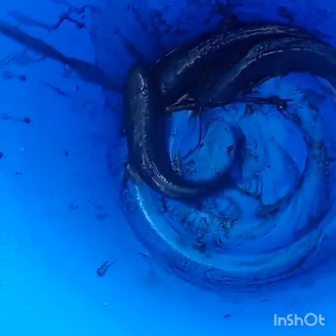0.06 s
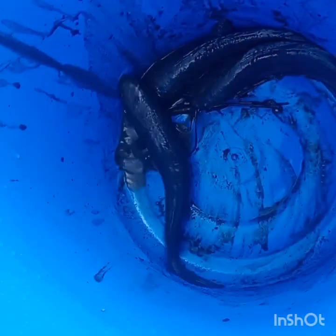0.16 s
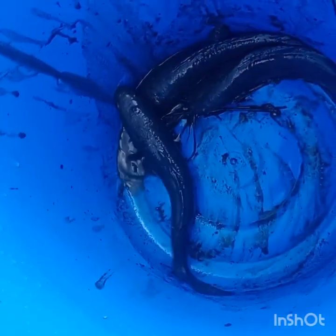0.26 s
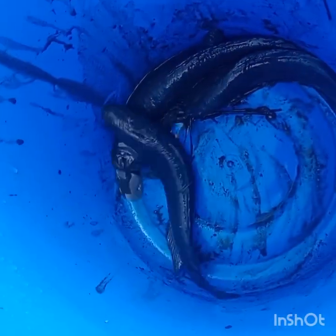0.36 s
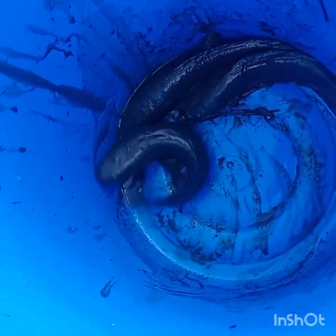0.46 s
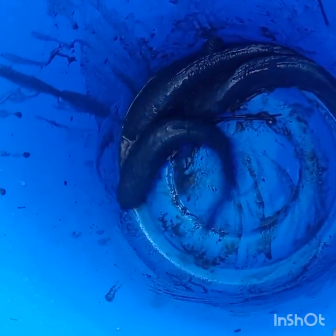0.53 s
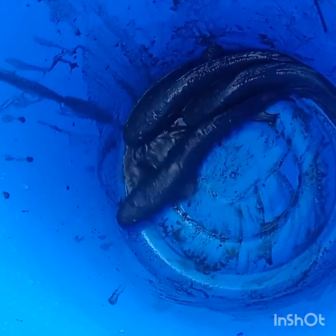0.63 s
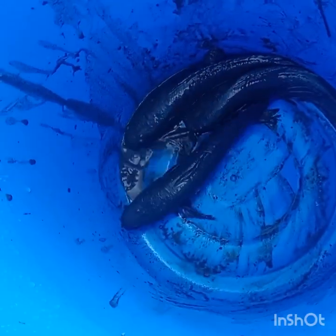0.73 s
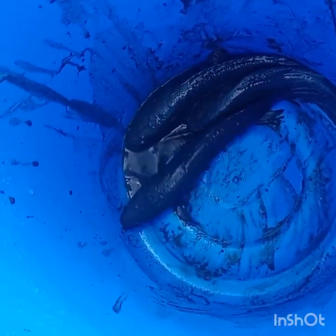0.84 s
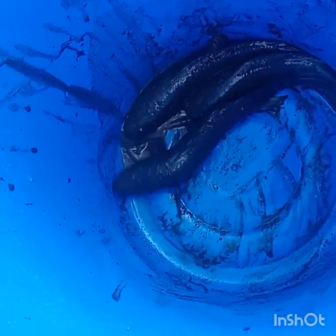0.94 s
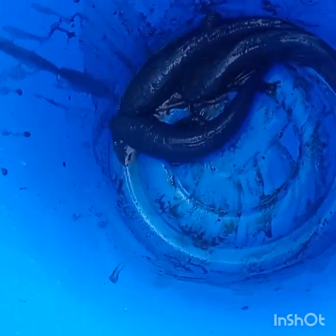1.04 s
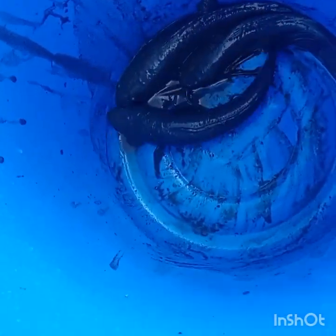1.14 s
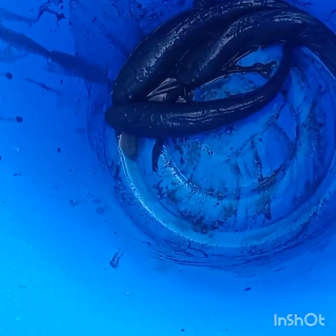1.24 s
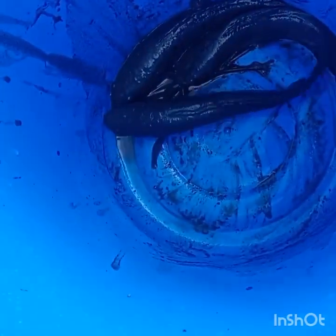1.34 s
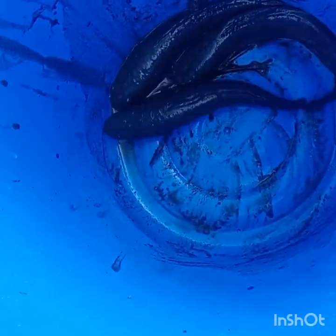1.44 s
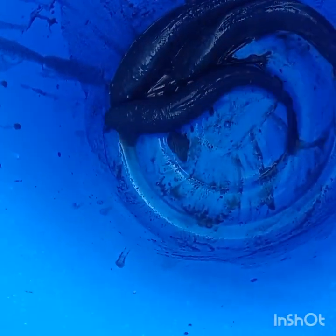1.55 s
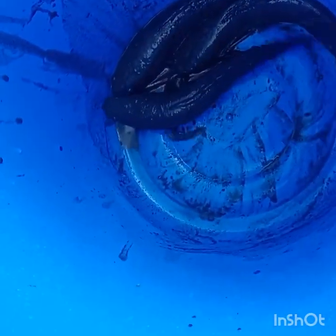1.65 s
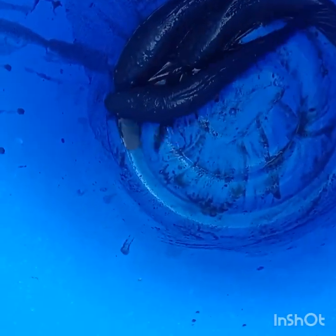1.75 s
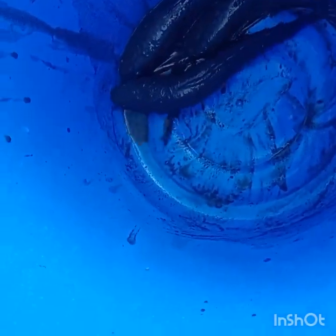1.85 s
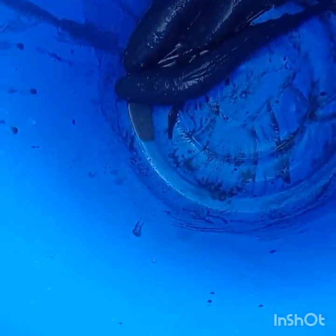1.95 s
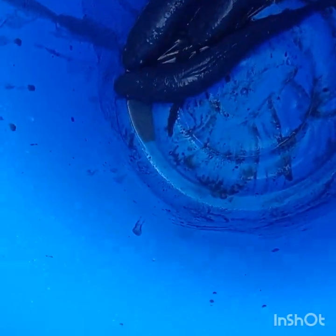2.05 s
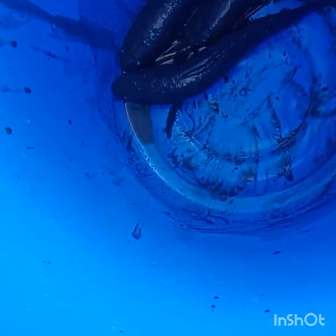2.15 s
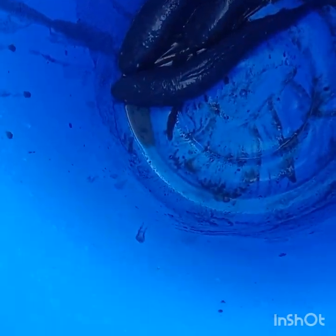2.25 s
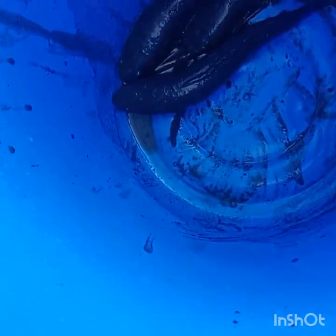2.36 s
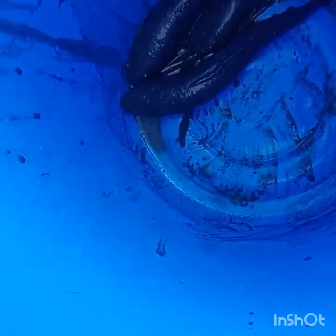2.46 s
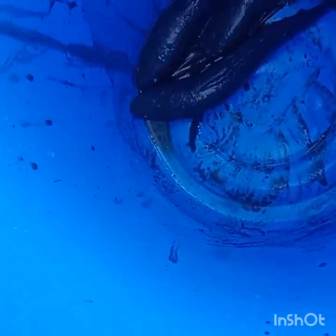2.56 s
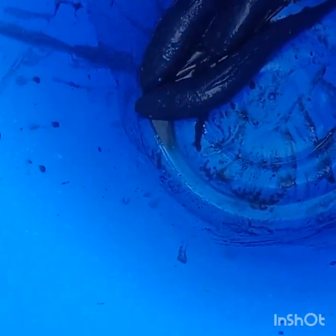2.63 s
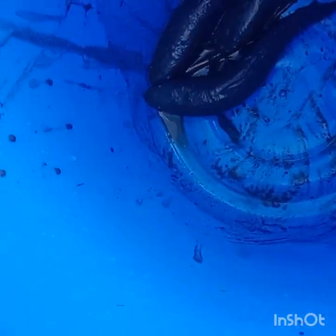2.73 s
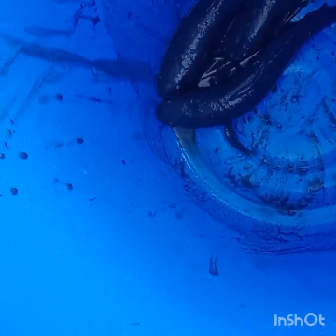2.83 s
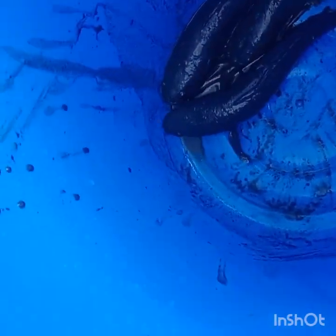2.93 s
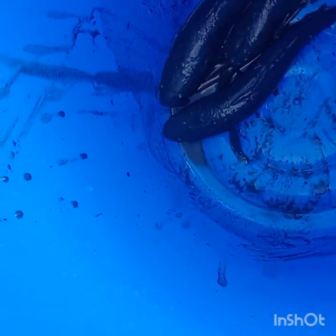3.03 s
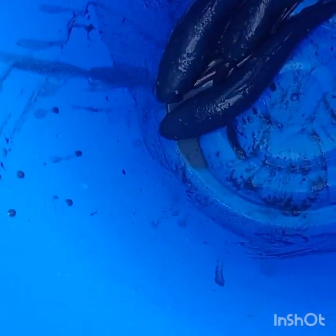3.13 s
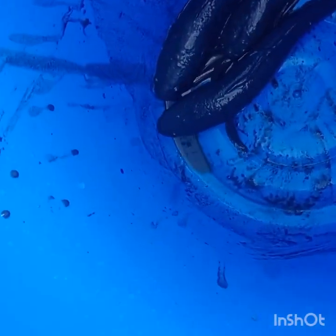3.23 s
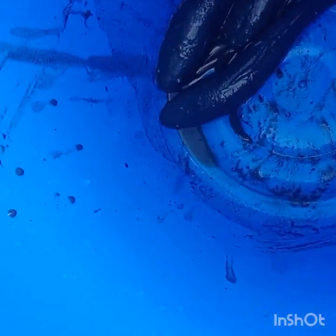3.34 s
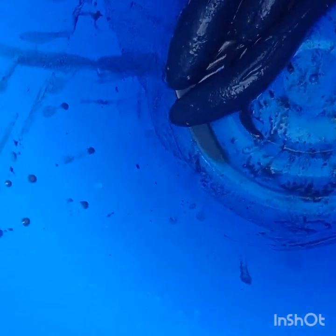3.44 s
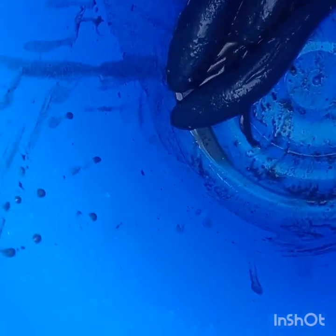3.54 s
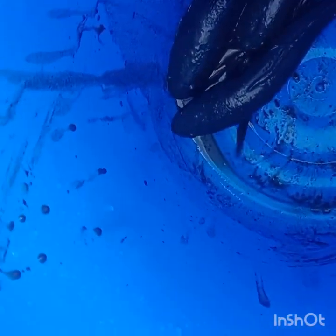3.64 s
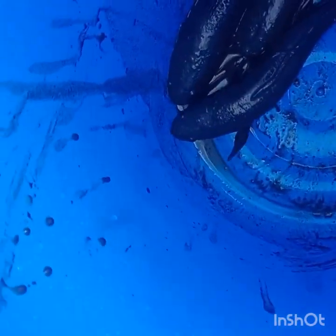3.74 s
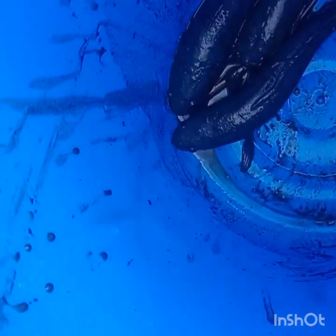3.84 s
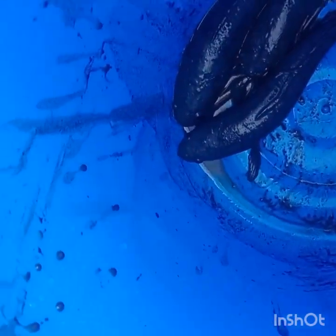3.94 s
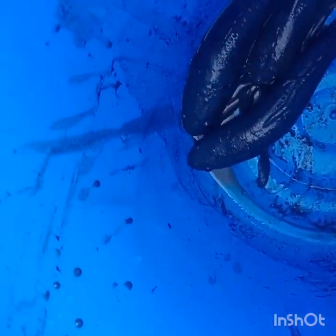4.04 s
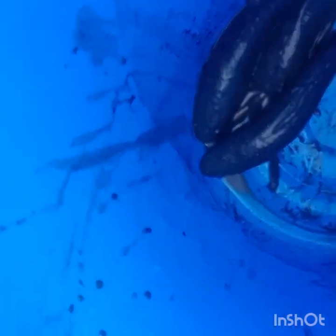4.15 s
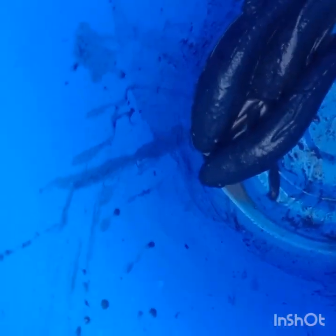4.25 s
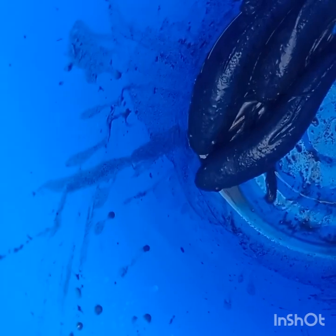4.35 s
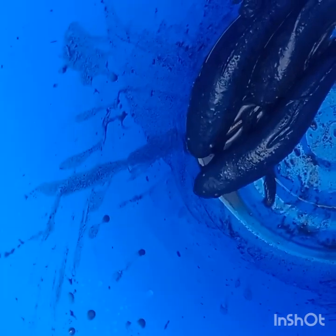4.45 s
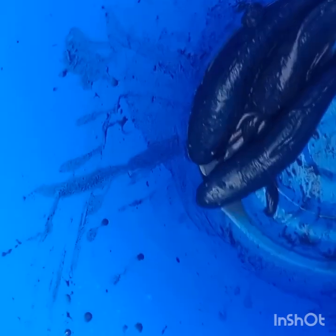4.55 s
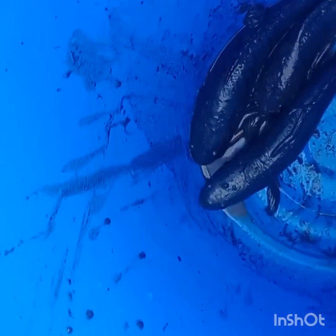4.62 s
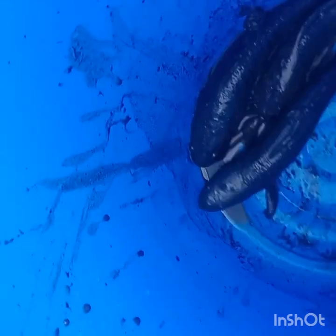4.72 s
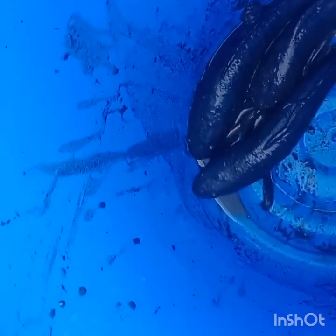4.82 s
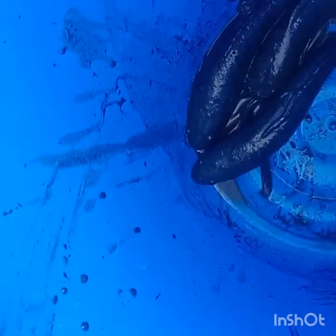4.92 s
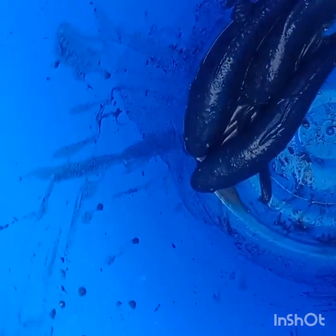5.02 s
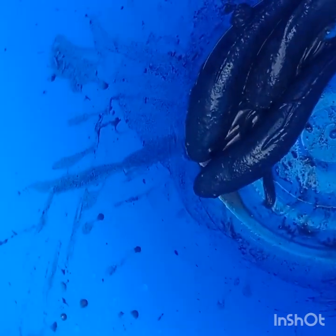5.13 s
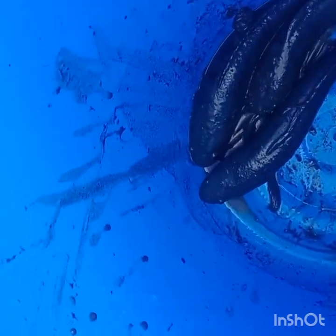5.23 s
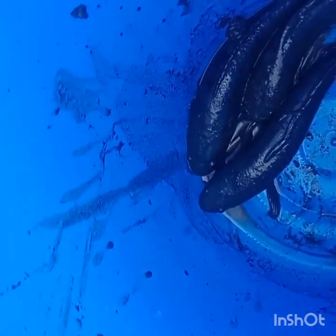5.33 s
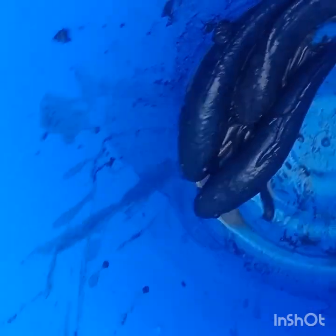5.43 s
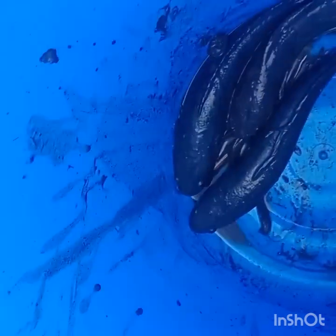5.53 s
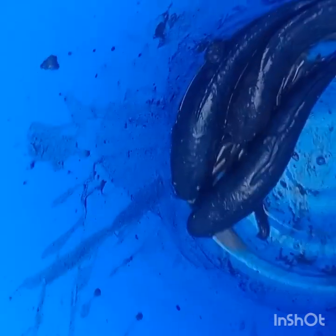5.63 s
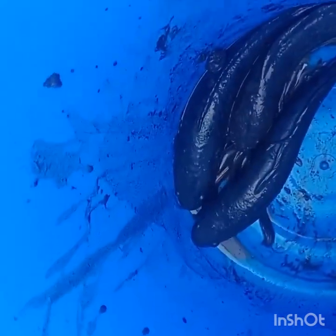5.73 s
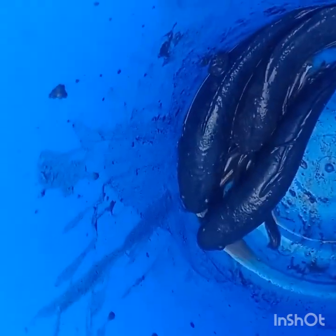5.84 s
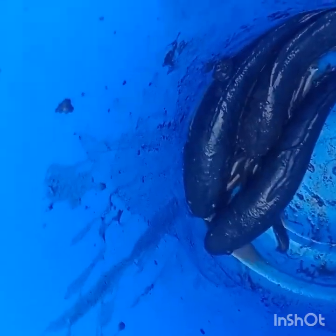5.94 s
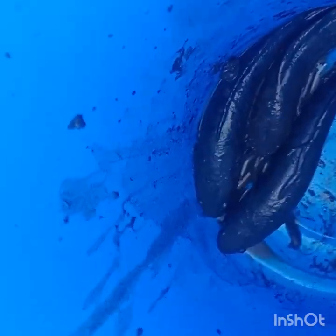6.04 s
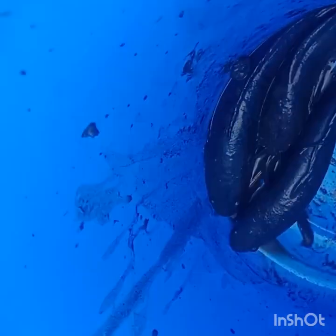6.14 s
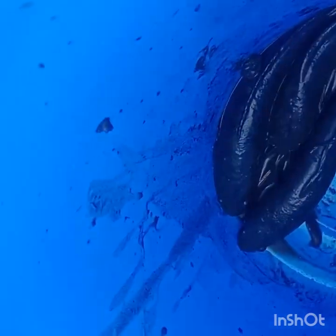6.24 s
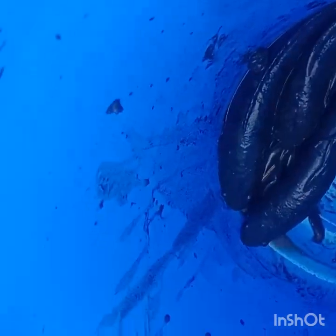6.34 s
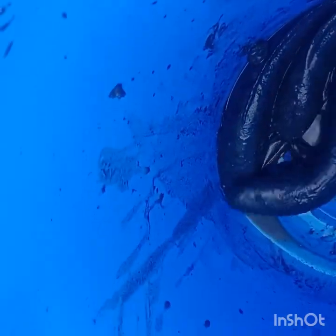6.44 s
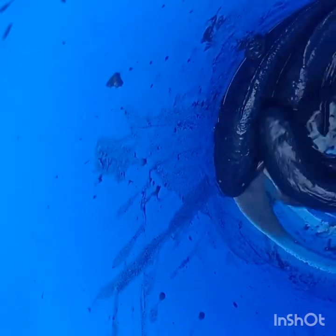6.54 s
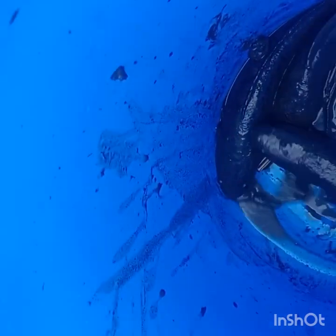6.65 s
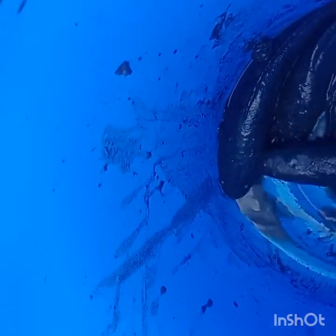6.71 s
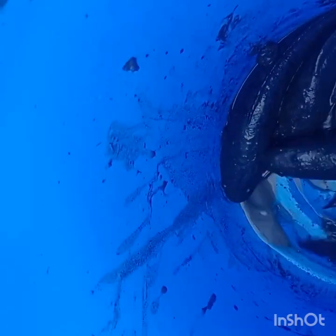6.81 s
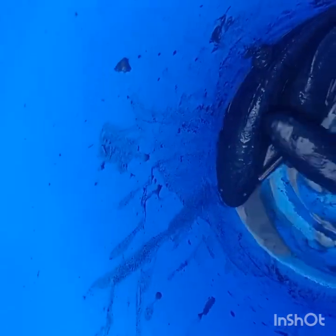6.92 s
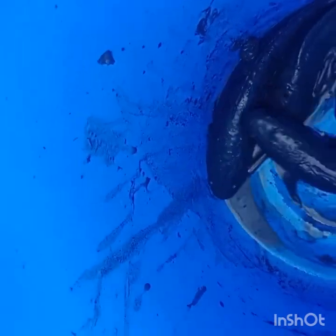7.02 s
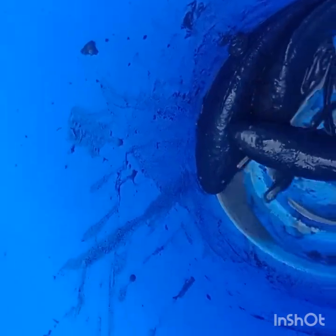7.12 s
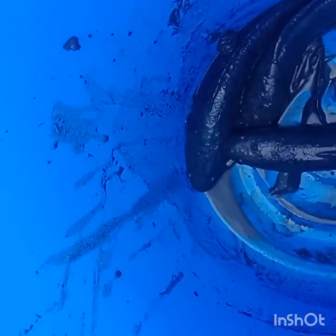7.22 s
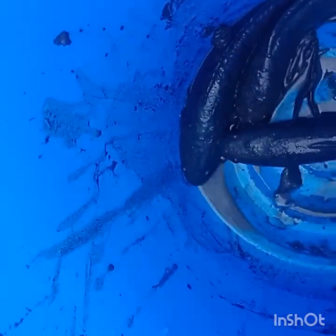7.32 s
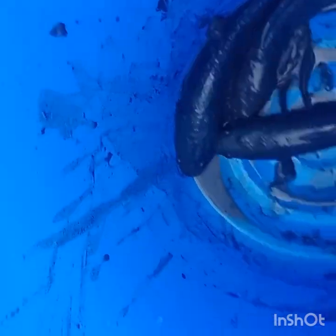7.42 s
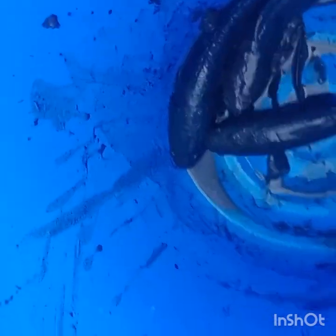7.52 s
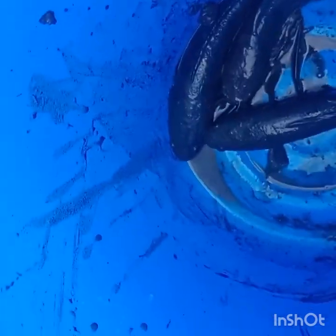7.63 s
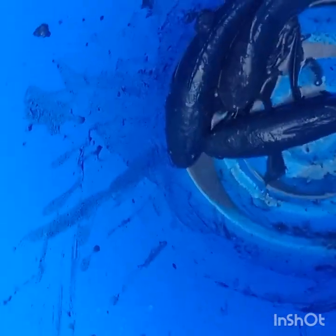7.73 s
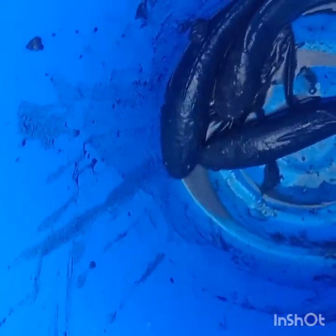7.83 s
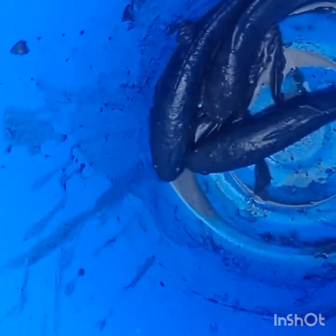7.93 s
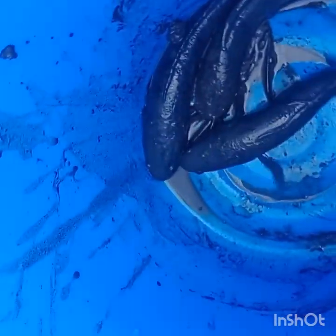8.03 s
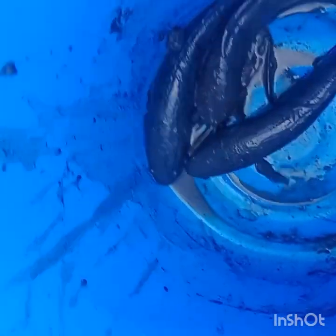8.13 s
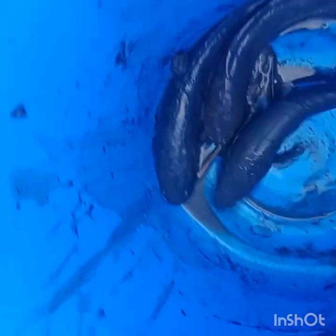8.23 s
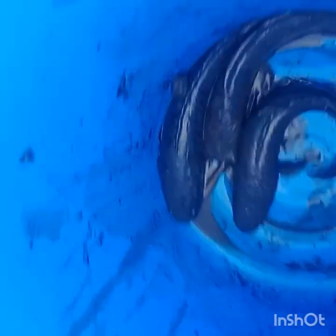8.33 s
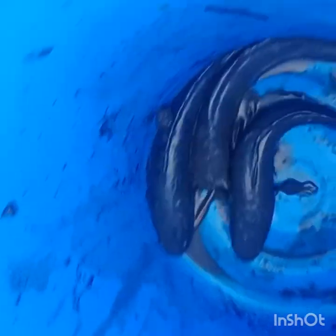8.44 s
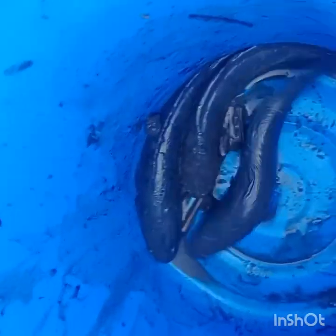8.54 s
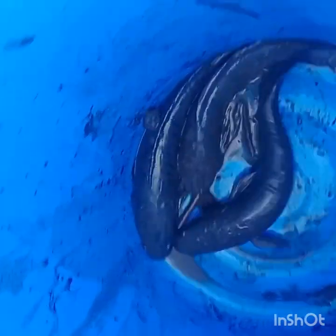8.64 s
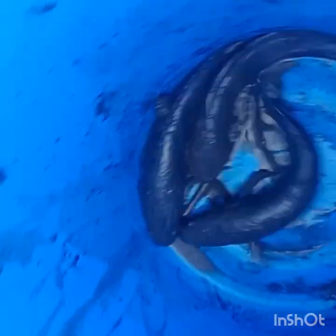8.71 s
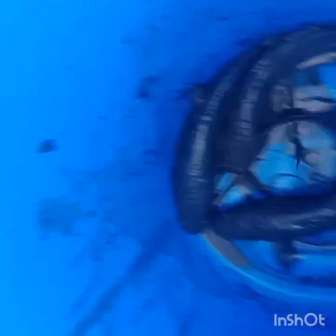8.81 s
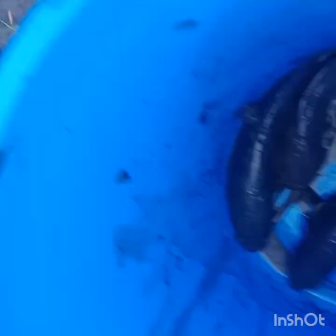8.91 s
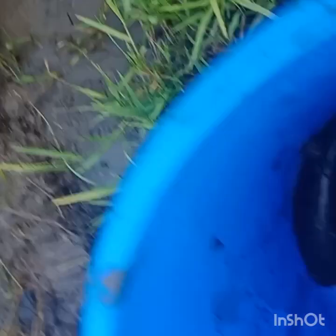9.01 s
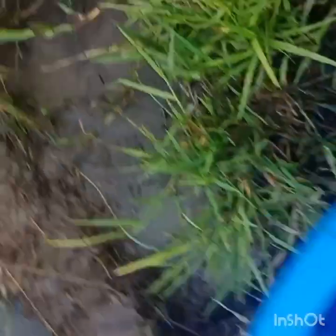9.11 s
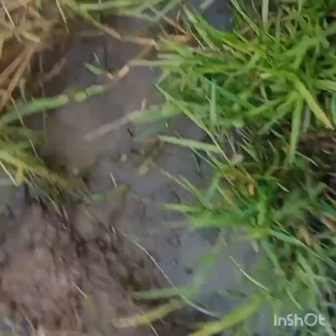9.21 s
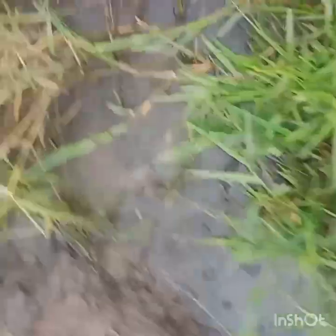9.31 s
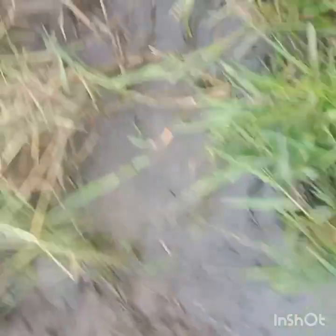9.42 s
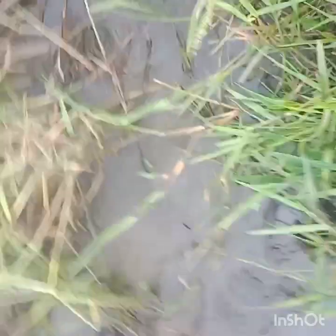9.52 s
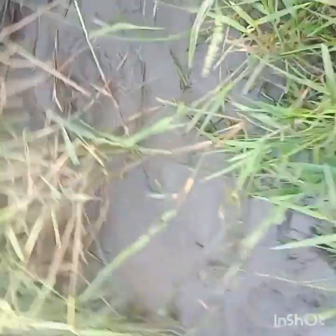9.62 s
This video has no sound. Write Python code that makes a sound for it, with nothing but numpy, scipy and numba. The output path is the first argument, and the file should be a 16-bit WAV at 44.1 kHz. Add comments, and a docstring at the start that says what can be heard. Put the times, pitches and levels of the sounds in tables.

```python
"""Fish wriggle in a film of muddy water at the bottom of a plastic basin outdoors, heard from just above.
Crowds of small ringing bubbles make the water trickle, gurgle, fizz and spray; single ones plop, gulp and slap.
Bodies drum and slide on the basin's resonant floor, and tails flick off droplets as very short high tones.
Fine swishes swell on the left, perhaps grass; a far insect ticks and whirrs; open air is shaped noise."""
import sys
import numpy as np
from scipy import signal
from scipy.fft import rfft, irfft, next_fast_len
from scipy.io import wavfile
from scipy.ndimage import uniform_filter1d
from numba import njit

SR = 44100
rng = np.random.default_rng(int(sys.argv[2]) if len(sys.argv) > 2 else 0)


def amplitude_ratio(level_db):
    """Convert a level in decibels to the matching linear amplitude (field) ratio."""
    exponent = np.asarray(level_db, float) / 20
    return 10 ** exponent


def materialize(psi):
    """Save the field psi as 16-bit PCM at rate SR to the path in sys.argv[1].

    A 1-D psi becomes a single channel; in a 2-D psi each row is a channel.
    """
    bounded = np.clip(np.atleast_2d(psi).T, -1, 1)
    quanta = np.round(bounded * 32767).astype(np.int16)
    wavfile.write(sys.argv[1], SR, quanta)


N = 426447
SECONDS = np.arange(N) / SR
LAG_PER_DB = 2.5  # samples by which the quieter microphone hears a sound later, per dB of difference


def colour(hz, points):
    """Reads the level in dB of a spectrum at given pitches."""
    point_hz, point_db = np.transpose(points)
    return np.interp(np.log(hz + 1), np.log(point_hz + 1), point_db)


def shaped(points):
    """Makes noise of rms 1 with a given spectrum."""
    size = next_fast_len(N)
    spectrum = rfft(rng.standard_normal(size))
    weight = amplitude_ratio(colour(np.fft.rfftfreq(size, 1 / SR), points))
    noise = irfft(spectrum * weight, size)[:N]
    return noise / noise.std()


@njit
def ring(rows, n, sr):
    """Decaying sines with a soft rise and a glide; rows (sample, Hz, t60, rise, glide per s, left, right, lag)."""
    out = np.zeros((2, n + 64))
    for start, hz, t60, rise, glide, left_gain, right_gain, lag in rows:
        wave, not_risen = 1 + 0j, 1.
        turn = np.exp(2j * np.pi * hz / sr - np.log(1000) / (t60 * sr))  # one sample of spin and decay
        bend = np.exp(2j * np.pi * hz * glide / sr ** 2)
        slow = np.exp(-1 / (rise * sr))
        left = int(start + max(-lag, 0))
        right = int(start + max(lag, 0))
        for i in range(min(int(t60 * sr), n - int(start))):
            wave, turn, not_risen = wave * turn, turn * bend, not_risen * slow
            out[0, left + i] += left_gain * (1 - not_risen) ** 2 * wave.imag
            out[1, right + i] += right_gain * (1 - not_risen) ** 2 * wave.imag
    return out[:, :n]


def grains(s, db, hz, t60, rise, glide, pan_db):
    """Places ringing tones between two microphones: the nearer one gets them louder and sooner."""
    t60, rise = np.clip(t60, .002, 1), np.clip(rise, 1e-5, 1)
    share = rise * np.log(1000) / t60 / 2
    db = db + 40 * np.log10((1 + share) * (1 + 1 / share) ** share)  # a slow rise must still reach its peak
    lag = np.clip(LAG_PER_DB * pan_db, -16, 16)
    left_gain, right_gain = amplitude_ratio(db + pan_db / 2), amplitude_ratio(db - pan_db / 2)
    start = np.clip(s * SR, 0, N - 1)
    columns = np.broadcast_arrays(start, hz, t60, rise, glide, left_gain, right_gain, lag)
    rows = np.stack([c.ravel() for c in columns], axis=1)
    return ring(rows.astype(float), N, float(SR))


def swells(s, hold_s, db, rise_s, fall_s):
    """Adds up the power of swells that climb, hold and die away evenly in dB; times are per 10 dB."""
    coarse = SECONDS[::64, None]
    before, after = (s - coarse) / rise_s, (coarse - s - hold_s) / fall_s
    away = np.maximum(np.maximum(before, after), 0)
    power = (amplitude_ratio(db - 10 * away) ** 2).sum(axis=1)
    return np.interp(SECONDS, coarse[:, 0], power)


# slow stirring of the water film: start_s, trickle_db
STIRRING = [(0, -54.5), (.3, -65.5), (.8, -62), (1.2, -64.5), (1.4, -74), (1.8, -67.5), (2.2, -61.5),
            (2.8, -50), (3.6, -54.5), (4.6, -54.5), (5.7, -51.5), (6.1, -50), (6.9, -54.5), (7.1, -61.5),
            (7.8, -55.5), (8.8, -54), (9.3, -55), (9.67, -55)]
# a fish heaves and water sloshes: start_s, hold_s, trickle_db, gurgle_minus_trickle_db
SLOSHES_OF_WATER = [(0, 0.057, -50.5, -8), (0.329, 0.089, -50, -10), (.43, 0.17, -49.5, -11.5),
                    (0.61, .11, -55.5, -0.5), (0.863, 0.24, -53.5, -1), (1.226, 0.03, -52.5, -3),
                    (1.464, 0.076, -57, -14), (1.688, 0.05, -56.5, -24), (1.857, 0.071, -55, -7),
                    (1.989, 0.031, -59.5, -1.5), (2.09, 0.13, -60, 1), (2.257, 0.042, -53.5, -3.5),
                    (2.367, .09, -53.5, -4), (2.501, 0.059, -41, -4), (2.591, 0.18, -44.5, -4),
                    (2.925, 0.14, -45, -5), (3.154, 0.032, -55, -7), (3.303, 0.058, -45.5, -9),
                    (3.472, 0.095, -49.5, -9), (3.629, 0.16, -54, 4), (3.864, .17, -47.5, -1),
                    (4.071, .04, -45, -10), (4.127, 0.091, -41.5, -7), (4.243, 0.075, -44.5, -2),
                    (4.434, 0.088, -50, 1.5), (4.644, 0.21, -52.5, -5.5), (4.81, 0.03, -44.5, -1),
                    (5.08, 0.048, -51, -11), (5.205, .08, -45.5, -4.5), (5.385, 0.18, -40.5, -9.5),
                    (5.626, .11, -43, -19), (5.78, 0.028, -50, 0), (6.259, 0.17, -41.5, -3.5),
                    (6.493, 0.11, -47.5, 0), (6.58, 0.025, -41, -1.5), (6.691, .1, -43.5, -10),
                    (7.298, 0.038, -52, -7), (7.421, .13, -46.5, -15), (7.623, 0.061, -48.5, -16),
                    (7.854, 0.15, -53, 0), (8.063, 0.084, -44, -2), (8.453, 0.11, -53, -7),
                    (8.665, 0.093, -53, 1), (9.028, .1, -45, -3), (9.281, 0.023, -47, -8),
                    (9.381, 0.084, -45, -14), (9.497, .1, -44, -7)]
# fine hiss swelling on the left, perhaps grass brushing the basin:
# crest_s, fizz_db, fall_s (time to fall 10 dB; a negative one swaps climb and fall, zero is silent), spray_db
GRASS_SWISHES = [(.55, -67, 0.4, -77), (1.07, -62.5, 0.3, -79), (1.25, -64.5, .06, -72),
                 (1.48, -63.5, 0.1, -70), (2.55, -56, 0.19, -76.5), (2.88, -62, 0.4, -76),
                 (3.07, -59, 0.15, -72), (3.18, -58.5, -0.36, -74.5), (3.3, -58.5, 0.04, -68.5),
                 (3.5, -63, .15, -75), (3.78, -61, -1.3, -79), (3.961, -55, 0.06, -72), (4.15, -55, 0, -75),
                 (4.38, -62, 0.7, -78), (4.74, -61, 0.2, -73), (5.08, -57.5, 0.46, -71.5),
                 (5.25, -59, .1, -79), (5.44, -48, .07, -70), (5.97, -52, 0.16, -69.5),
                 (6.28, -58.5, 0.3, -77), (6.6, -56, .07, -82), (6.78, -57, .15, -71),
                 (7.18, -60, 0.2, -73.5), (7.3, -54.5, 0.13, -78), (7.41, -54.5, 0.11, -66),
                 (7.51, -54, 0.14, -76), (7.85, -61.5, 0.7, -77), (8.13, -50.5, .1, -68),
                 (8.26, -52.5, 0.15, -68.5), (8.6, -70, -0.8, -76), (9.05, -61.5, 0.6, -77),
                 (9.43, -52.5, .1, -73), (9.53, -55, .1, -72)]
RISE_SHARE = 0.64  # a swish climbs 10 dB in this share of its fall time
SLOSH_RISE_S, SLOSH_FALL_S = 0.0083, 0.031  # time for 10 dB
STIR_GURGLE_DB, SLOSH_FIZZ_DB, SWISH_TRICKLE_DB = -7.5, -38, 2.5  # what motions add to other bubble sizes
# left minus right, before each bubble size takes its own share
STIR_PAN_DB, SLOSH_PAN_DB, SWISH_PAN_DB = 9.5, 3, 17.5
SPRAY_DB = -79.5  # steady spray between swishes


def stirring():
    """Moving water sets the levels of four bubble sizes and their side: stirring, sloshes and swishes add up."""
    s, hold_s, db, gurgle_db = np.transpose(SLOSHES_OF_WATER)
    crest_s, crest_db, fall_s, spray_db = np.transpose(GRASS_SWISHES)
    rise_s = RISE_SHARE * fall_s
    # all of these are powers
    stir = amplitude_ratio(np.interp(SECONDS, *np.transpose(STIRRING))) ** 2
    slosh = swells(s, hold_s, db, SLOSH_RISE_S, SLOSH_FALL_S)
    swish = swells(crest_s, 0, crest_db, rise_s, fall_s)
    spray_power = amplitude_ratio(SPRAY_DB) ** 2 + swells(crest_s, 0, spray_db, rise_s, fall_s)
    brushed = amplitude_ratio(SWISH_TRICKLE_DB) ** 2 * swish
    trickle_power = stir + slosh + brushed
    slosh_gurgle = swells(s, hold_s, db + gurgle_db, SLOSH_RISE_S, SLOSH_FALL_S)
    gurgle_power = amplitude_ratio(STIR_GURGLE_DB) ** 2 * stir + slosh_gurgle
    fizz_power = swish + amplitude_ratio(SLOSH_FIZZ_DB) ** 2 * (stir + slosh)
    # the side leans towards whichever motion is strongest
    pan_db = (STIR_PAN_DB * stir + SLOSH_PAN_DB * slosh + SWISH_PAN_DB * brushed) / trickle_power
    levels = [10 * np.log10(p) for p in (trickle_power, gurgle_power, fizz_power, spray_power)]
    return (*levels, pan_db)


def drops(level_db, pan_db, spectrum, cycles, scatter_db, pan_spread_db, count):
    """A crowd of small bubbles, many faint and a few loud; each rings for some cycles and rises in pitch."""
    when, pitch, size, side, length = rng.random((count, 5)).T
    lowest, highest = spectrum[0][0], spectrum[-1][0]
    hz = lowest * (highest / lowest) ** pitch
    db = colour(hz, spectrum) + 20 * np.log10(hz) - scatter_db * np.log(size)
    t60 = cycles * (.5 + length) / hz
    pan = pan_db[(when * N).astype(int)] + pan_spread_db * (2 * side - 1)
    crowd = grains(when * N / SR, db, hz, t60, 0.36 / hz, 0.18 / t60, pan)
    return crowd / crowd.mean(axis=0).std() * amplitude_ratio(level_db)


# loudness of trickling drops by pitch: pitch_hz, relative_level_db
TRICKLE_SPECTRUM = [(1400, -11), (1900, -7), (2600, -4.5), (3200, -8), (3800, -8.5), (4500, -30)]


def trickle(level_db, pan_db):
    """Small drops ring at middle to high pitches."""
    return drops(level_db, 1.3 * pan_db, TRICKLE_SPECTRUM, 45, 1.1, 5.0, count=30000)


# loudness of gurgling bubbles by pitch: pitch_hz, relative_level_db
GURGLE_SPECTRUM = [(330, -39), (450, -12.5), (900, 1), (1200, 1.5), (1700, 3.5)]


def gurgle(level_db, pan_db):
    """Larger bubbles ring lower."""
    return drops(level_db, .7 * pan_db, GURGLE_SPECTRUM, 32, 1.15, 6.0, count=13000)


# loudness of fizzing bubbles by pitch: pitch_hz, relative_level_db
FIZZ_SPECTRUM = [(4000, 10), (5500, -5), (7200, -27)]


def fizz(level_db, pan_db):
    """Tiny bubbles ring high."""
    return drops(level_db, .35 * pan_db, FIZZ_SPECTRUM, 37, 0.9, 4.0, count=20000)


# loudness of the finest spray by pitch: pitch_hz, relative_level_db
SPRAY_SPECTRUM = [(6500, 2), (9000, -5), (15300, -0.5)]


def spray(level_db, pan_db):
    """The tiniest droplets blend into a hiss in the high treble."""
    return drops(level_db, 3.0 + .2 * pan_db, SPRAY_SPECTRUM, 30, 0.55, 3.6, count=40000)


def surges(fall_s, scatter_db, base, count):
    """Water moves in small sudden slops that die away; one envelope of rms 1 serves several bubble sizes."""
    when, size = rng.random((count, 2)).T
    kicks = np.zeros(N)
    kicks[(when * N).astype(int)] = amplitude_ratio(-scatter_db * np.log(size))
    swell = base + signal.lfilter([1], [1, -np.exp(-1 / (fall_s * SR))], kicks)
    return swell / np.sqrt(np.mean(swell ** 2))


# resonances of the basin wall and the air inside: pitch_hz, width_hz, boost_db
WALL_RESONANCES = [(528, 24, 6.5), (741, 18, 8), (893, 30, 6), (1480, 20, 2), (3180, 98, 1)]


def walls(x):
    """The basin wall and the air inside it favour a few pitches of the water."""
    out = x
    for hz, width, db in WALL_RESONANCES:
        out = out + (amplitude_ratio(db) - 1) * signal.lfilter(*signal.iirpeak(hz, hz / width, fs=SR), x)
    return out


# resonances of the basin floor, also drummed on by thuds(): pitch_hz, relative_level_db, t60_s (60 dB decay)
BASIN_MODES = [(77, -42, 0.055), (101.4, -6.5, 0.3), (135, 3, 0.11), (164.2, 7, 0.11), (193.8, 7, 0.074),
               (218.8, 0, 0.11), (299, -6, 0.018), (416, -27, 0.062), (472, -13, 0.022)]
# bodies sliding on the basin floor: start_s, rumble_db, left_minus_right_db
SLIDES = [(0.0, -56, -1), (0.59, -64.5, 0.0), (0.97, -49.5, -1), (1.26, -66.5, 0.5), (2.05, -59.5, -2),
          (2.56, -53.5, 2), (3.5, -55, -1), (3.9, -50, -0.5), (4.36, -48, -3), (4.52, -59, 2),
          (5.25, -54, -1), (5.49, -46, -5), (5.9, -53, -1.5), (6.3, -54.5, -4.5), (6.6, -44, -10),
          (6.73, -50, -1), (7.19, -56.5, 0), (7.92, -53.5, -1.0), (8.29, -55, 0.0), (8.64, -48.5, -4.5),
          (8.83, -48, -4), (9.67, -55.5, -2.5)]


def rumble():
    """Sliding bodies push the basin modes with rough, bumpy noise."""
    s, db, pan_db = np.transpose(SLIDES)
    # the push wanders slowly by about 3 dB
    bumps = amplitude_ratio(3.0 * np.sqrt(1500) * uniform_filter1d(rng.standard_normal(N), size=1500))
    push = bumps * rng.standard_normal(N)
    out = 0
    for hz, mode_db, t60 in BASIN_MODES:
        radius = np.exp(-np.log(1000) / (t60 * SR))
        poles = [1, -2 * radius * np.cos(2 * np.pi * hz / SR), radius ** 2]
        out = out + amplitude_ratio(mode_db) * signal.lfilter([1, 0, -1], poles, push)
    sides = np.array([[.5], [-.5]]) * np.interp(SECONDS, s, pan_db)
    return out / out.std() * amplitude_ratio(np.interp(SECONDS, s, db) + sides)


# spectrum of the open air: pitch_hz, relative_level_db (per Hz)
AIR_SPECTRUM = [(15, -33), (25, -10), (55, -7), (157, -3.5), (363, -20.5), (659, -14.5), (1100, -20),
                (3520, -25), (4740, -35), (7510, -39.5), (8140, -49), (14800, -55), (16000, -47)]
AIR_DB = -58.5  # level of the shared part


def air():
    """Open-air hiss and low rumble: bass shared by both microphones, treble unrelated."""
    mid, side = shaped(AIR_SPECTRUM), shaped(AIR_SPECTRUM)
    side = signal.sosfilt(signal.butter(1, 250, "high", fs=SR, output="sos"), side)
    return amplitude_ratio(AIR_DB) * np.array([mid + side, mid - side])


BURST_RING = .55  # tiny bubbles die sooner than the main drop
BURST_KNEE_HZ, BURST_DB_PER_OCTAVE = 4450, 17.5  # above the knee the tiny bubbles grow fainter


def wet_hits(rows):
    """A main drop tone inside a broad burst of tiny bubbles that thins out within a few ms."""
    s, db, hz, t60, pan_db = np.array(rows).T[:, :, None]
    late, off = np.moveaxis(rng.random((len(s), 60, 2)), -1, 0)
    octaves = 3.01 * (off - .55)
    faint_db = BURST_DB_PER_OCTAVE * np.maximum(np.log2(hz / BURST_KNEE_HZ) + octaves, 0)
    main = grains(s, db - 5, hz, t60, 0.028 * t60, 0, pan_db)
    burst_s = s + .45 * t60 * late ** 1.4
    burst_db = db - 15.5 - 16 * late ** 2 - 10 * octaves ** 2 - faint_db
    burst = grains(burst_s, burst_db, hz * 2 ** octaves, BURST_RING * t60, 0.00027, 0, pan_db)
    return main + burst


# wet slaps and drops: start_s, level_db, pitch_hz, t60_s (60 dB decay), left_minus_right_db
WET_SLAPS = [(0.0152, -37, 2340, 0.018, 9), (0.0423, -30, 2420, 0.018, 8), (0.0667, -41, 2810, 0.018, 6),
             (0.1705, -37, 2720, 0.016, 16), (0.2436, -42, 3720, 0.018, 11), (0.3137, -37, 2100, 0.02, 18),
             (0.3601, -33.5, 2170, 0.021, 14), (0.393, -21, 2310, 0.018, 6.5),
             (0.4179, -31, 1820, 0.021, 14), (0.4479, -36, 2630, 0.019, 8.5),
             (0.4933, -30.5, 2170, 0.022, 7), (0.5292, -32.5, 2310, 0.019, 9.5),
             (0.5985, -18, 2720, 0.014, 9.5), (0.623, -34, 2970, 0.018, 11),
             (0.6946, -32.5, 1850, 0.018, 2.5), (0.8343, -27.5, 2710, 0.023, 12.5),
             (1.1795, -32.5, 2490, 0.018, 8), (1.2914, -45, 3580, 0.019, 10), (1.3503, -40, 2130, 0.021, 9),
             (1.4755, -39, 3450, 0.019, 5.0), (1.5229, -40, 2680, 0.024, 6), (1.5544, -43, 2810, 0.018, 11),
             (1.7034, -40, 2100, 0.018, 5.5), (1.8402, -36.5, 1640, 0.028, 10),
             (1.8675, -37, 1930, 0.022, 8.5), (1.893, -38.5, 3550, 0.018, 10),
             (1.925, -42, 2200, 0.021, 11), (1.9579, -41.5, 3470, 0.018, 12), (2.0288, -41, 2190, 0.018, 9),
             (2.091, -41, 2310, 0.019, 8), (2.1656, -40.5, 2540, 0.018, 0), (2.2233, -39, 2610, 0.018, 8.5),
             (2.2807, -40, 2550, 0.018, 6), (2.386, -39, 2830, 0.018, 7.0), (2.401, -32, 1700, 0.018, 6),
             (2.4202, -31, 2720, 0.019, 12), (2.5005, -31, 2730, 0.017, 11), (2.5082, -23, 2870, 0.014, 13),
             (2.523, -21.5, 2200, 0.017, 12), (2.5925, -31, 2950, 0.02, 8), (2.6127, -30, 2430, 0.017, 12),
             (2.6607, -29.5, 2480, 0.014, 15), (2.6825, -30.5, 2540, 0.018, 15),
             (2.7022, -29, 3180, 0.018, 8.5), (2.7443, -30, 2570, 0.018, 11.5),
             (2.7675, -25, 2710, 0.016, 11.5), (2.8439, -33, 2000, 0.016, 14),
             (2.9302, -31, 3260, 0.018, 11.5), (2.9986, -31.5, 2450, 0.018, 9),
             (3.0235, -32, 2420, 0.014, 6), (3.316, -27.5, 2920, 0.018, 15),
             (3.3493, -29.5, 2330, 0.015, 16), (3.46, -24, 2390, 0.019, 11), (3.4795, -30, 1720, 0.02, 8),
             (3.7217, -35, 2550, 0.022, 15), (3.9634, -33, 1980, 0.019, 6), (4.071, -34, 2530, 0.018, 13),
             (4.137, -27.5, 2470, 0.018, 14), (4.147, -25, 2360, 0.025, 9),
             (4.2772, -28.5, 2320, 0.029, 12), (4.5955, -34.5, 3000, 0.016, 15),
             (4.8284, -26.5, 2240, 0.014, 9.5), (4.8609, -29, 2550, 0.018, 10),
             (5.0833, -31, 1760, 0.018, 10.5), (5.2653, -31, 1740, 0.021, 8),
             (5.3892, -30, 2860, 0.018, 16), (5.4045, -22.5, 2940, 0.0097, 16),
             (5.4979, -27, 2500, 0.016, 15), (5.552, -28, 2760, 0.012, 4.5), (5.6394, -28, 2960, 0.019, 12),
             (5.66, -27, 2830, 0.019, 15), (5.6916, -30, 2820, 0.025, 13), (5.9803, -26, 1700, 0.025, 9.5),
             (6.0322, -33, 3580, 0.022, 11), (6.1812, -33, 2610, 0.022, 13), (6.356, -23, 2480, 0.018, 5.5),
             (6.4264, -41, 2860, 0.01, 3.5), (6.5853, -21.5, 2240, 0.016, 5.0),
             (6.5993, -7.5, 3150, 0.018, 0.5), (6.6443, -24.5, 2550, 0.018, 4.5),
             (6.6895, -30, 2930, 0.021, 9.0), (6.7012, -26, 3200, 0.022, 14),
             (6.773, -22.5, 2860, 0.018, 15), (7.2504, -36.5, 2930, 0.017, 14.0),
             (7.427, -36, 2700, 0.014, 13.0), (7.534, -22, 2700, 0.032, 10),
             (7.7654, -35.5, 2970, 0.014, 14), (8.0691, -38, 1880, 0.025, 1),
             (8.2295, -27, 2770, 0.017, 16), (8.4633, -38, 2400, 0.018, 9),
             (8.541, -18.5, 2050, 0.024, 4.5), (8.664, -33, 2300, 0.014, 5.5),
             (8.7208, -18.5, 2380, 0.018, 2.5), (9.0296, -13.5, 3520, 0.016, 0.5),
             (9.0718, -31, 2700, 0.016, 10), (9.1042, -29, 2700, 0.016, 1),
             (9.2904, -22, 3180, 0.017, -1.5), (9.3741, -35.5, 3300, 0.017, 12),
             (9.4258, -25.5, 2970, 0.016, 15), (9.5502, -25.5, 3410, 0.018, 14),
             (9.5856, -22, 3060, 0.018, 12)]


def slaps():
    """Each slap on the water is a drop tone with a burst of tiny bubbles."""
    return wet_hits(WET_SLAPS)


DRIP_DB, DRIP_SPREAD_DB = 11, 1  # most above the trickle, and how far below that a drip may be
DRIP_HZ, DRIP_OCTAVES, DRIP_T60_S = 2550, 0.64, 0.026  # middle pitch, full range, ring time
DRIP_PAN_DB = 11  # average left minus right


def drips(trickle_db, count):
    """Smaller drops fall at random, as strong as the water is stirred."""
    when, size, pitch, side = rng.random((count, 4)).T
    db = trickle_db[(when * N).astype(int)] + DRIP_DB - DRIP_SPREAD_DB * size
    hz = DRIP_HZ * 2 ** (DRIP_OCTAVES * (pitch - .5))
    t60 = np.full(count, DRIP_T60_S)
    return wet_hits(np.stack([when * N / SR, db, hz, t60, 2 * side * DRIP_PAN_DB], axis=1))


# bodies drumming on the basin: start_s, level_db, favoured_pitch_hz, rise_s, left_minus_right_db
BODY_THUDS = [(0.165, -45.5, 200, 0.0051, 0), (0.207, -46, 203, 0.0035, 0), (0.621, -25, 236, 0.0063, 0.5),
              (0.641, -24.5, 217.3, 0.004, 0.5), (0.829, -46.5, 188, 0.0057, 0.0),
              (1.108, -42.5, 181, 0.0045, 0.5), (1.245, -28, 295, 0.008, -1.5),
              (1.61, -52.5, 158, 0.0041, -0.5), (2.006, -51, 204, 0.007, 0.5), (2.108, -55, 144, 0.006, 0),
              (2.806, -41.5, 145, 0.0074, -1), (3.17, -42.5, 220, 0.005, 0.0),
              (3.68, -38, 147.4, 0.0054, 0.5), (3.82, -36.5, 219, 0.0034, 0.5),
              (3.909, -36, 229, 0.008, 0.5), (4.103, -35, 224, 0.0078, -1.5),
              (4.274, -40, 170, 0.0048, -0.5), (4.449, -40.5, 214, 0.0039, -2.5),
              (4.958, -42.5, 135, 0.0044, -0.5), (5.376, -35, 218, 0.0049, -2.5),
              (5.516, -37.5, 215, 0.0057, -1.5), (5.795, -35, 193, 0.0067, -4),
              (6.297, -40, 223, 0.012, -4.0), (6.422, -32, 153.3, 0.009, -3),
              (6.484, -30, 226, 0.014, -3.5), (6.528, -27, 235, 0.0065, -3), (6.594, -33, 205, 0.0059, -2),
              (6.655, -27.5, 141, 0.0026, -3), (6.729, -21, 192, 0.0041, -3.0),
              (6.934, -40, 152.5, 0.0028, -2.5), (7.429, -31.5, 249, 0.0045, -2),
              (7.957, -42.5, 146, 0.0084, -1.5), (8.115, -38, 228, 0.0029, -3),
              (8.6, -29.5, 241, 0.0079, -5), (8.664, -22, 118.4, 0.0019, -5.5),
              (8.72, -32, 216, 0.0029, -3.5), (8.98, -28.5, 224, 0.0063, -2.5),
              (9.284, -42, 129, 0.0042, 1)]


def thuds():
    """A soft body excites the basin modes nearest to the pitch that its contact time favours."""
    s, db, hz, rise, pan_db = np.array(BODY_THUDS).T[:, :, None]
    mode_hz, mode_db, t60 = np.transpose(BASIN_MODES)
    off_pitch_db = np.minimum(220 * np.log2(mode_hz / hz) ** 2, 17)
    # minus: the floor first dips away
    return -grains(s, db + mode_db - off_pitch_db, mode_hz, t60, rise, 0, pan_db)


GAP_S = .19  # average time between the insect's ticks


def insect():
    """A far insect to the right ticks about five times a second over a faint steady whirr of narrow noise."""
    step, size = rng.standard_normal((52, 2)).T
    tick_s = np.cumsum(GAP_S + 0.0062 * step)
    ticks = grains(tick_s, -70 + 4.9 * size, 7480, 0.069, 0.0018, 0, np.array(-9.0))
    whirr = signal.lfilter(*signal.iirpeak(7450, 14, fs=SR), rng.standard_normal(N))
    return ticks + amplitude_ratio(-67) * whirr * np.array([[.45], [1]])


# air pockets closing under the fish: start_s, level_db, pitch_hz, t60_s (60 dB decay), left_minus_right_db
AIR_PLOPS = [(0.317, -28.5, 980, 0.051, -4.5), (0.398, -30.5, 980, 0.056, 8.5),
             (0.599, -47, 1340, 0.064, -13), (0.882, -36, 1003, 0.047, 11.5), (1.235, -31.5, 500, 0.11, 3),
             (2.256, -39.5, 1430, 0.048, 3), (2.281, -43.5, 763, 0.073, 4), (2.4, -38, 1620, 0.049, 0.5),
             (2.503, -35, 1490, 0.031, 3.5), (2.51, -30.5, 1480, 0.087, 0), (2.533, -31.5, 1494, 0.074, -2),
             (2.592, -42, 1530, 0.037, 12), (2.633, -41, 1460, 0.048, 0), (2.668, -27.5, 890, 0.039, 10.5),
             (2.758, -40, 1220, 0.049, 9), (2.931, -38, 535, 0.12, 4.5), (3.008, -38.5, 1540, 0.057, 17.5),
             (3.154, -41, 880, 0.044, 7), (3.169, -38, 740, 0.048, 3), (3.48, -38.5, 1450, 0.078, 8),
             (3.57, -38.5, 1240, 0.024, 17), (3.664, -40.5, 907, 0.088, 19), (3.687, -39.5, 793, 0.11, 13),
             (3.751, -37.5, 638, 0.027, 1), (3.873, -41.5, 964, 0.11, 17), (3.917, -40, 894, 0.11, 16),
             (3.945, -42, 950, 0.042, 15), (4.452, -39, 530, 0.055, 6), (4.556, -42, 497, 0.044, 6),
             (4.834, -34.5, 934, 0.082, 4), (4.86, -36.5, 1390, 0.058, 1), (5.216, -37.5, 934, 0.042, 0.5),
             (5.378, -38.5, 506, 0.021, -7), (5.405, -31, 1405, 0.045, 8), (5.49, -38, 900, 0.055, -2),
             (5.551, -30.5, 1410, 0.033, -4), (5.656, -38.5, 1140, 0.095, 9), (5.962, -42, 1190, 0.05, 9),
             (5.981, -33.5, 1385, 0.03, 15), (6.001, -38, 1080, 0.05, 21.5), (6.032, -34.5, 806, 0.06, 7.5),
             (6.146, -36, 1090, 0.024, 14), (6.248, -46, 656, 0.032, 5), (6.263, -37, 1480, 0.056, 2),
             (6.284, -34, 1510, 0.081, 2.5), (6.424, -36, 915, 0.042, -3), (6.519, -43, 1230, 0.03, 15),
             (6.576, -32, 1150, 0.054, -3), (6.602, -41, 1400, 0.04, -5), (7.341, -37, 778, 0.068, 5.5),
             (7.472, -34.5, 472, 0.051, 7), (7.533, -35.5, 1110, 0.023, 4.5), (7.652, -41.5, 650, 0.027, 1),
             (7.962, -40, 1017, 0.096, 17), (7.98, -35.5, 884, 0.048, -4), (8.022, -39, 1410, 0.031, 14),
             (8.066, -37, 1376, 0.074, 11), (8.119, -24, 925, 0.023, 2), (8.37, -40, 1370, 0.027, 14.5),
             (8.541, -43, 1064, 0.074, 19), (8.661, -33, 748, 0.036, -4), (8.721, -24, 1227, 0.038, 5.5),
             (8.851, -43, 736, 0.059, -2.5), (8.944, -38.5, 1040, 0.042, 3.5),
             (9.026, -35.5, 840, 0.054, 3), (9.103, -27.5, 1300, 0.037, 9.5), (9.494, -45, 840, 0.037, -3),
             (9.513, -37, 820, 0.051, -3), (9.533, -30, 1440, 0.048, 10.5), (9.584, -36, 735, 0.081, 2.5)]


def plops():
    """One bubble each, rising a little in pitch, in a short slosh of weaker neighbours."""
    s, db, hz, t60, pan_db = np.array(AIR_PLOPS).T[:, :, None]
    late, off = np.moveaxis(rng.random((len(s), 8, 2)), -1, 0)
    near_hz = hz * 2 ** (2.2 * (off - .4))
    slosh = grains(s + .4 * t60 * late, db - 6 - 8 * late, near_hz, .5 * t60, 0.00031, 0, pan_db)
    return grains(s, db, hz, t60, 0.00051, 0.61, pan_db) + slosh


# sliding gulps of air: start_s, level_db, first_pitch_hz, later_pitch_hz, slide_s
AIR_GULPS = [(.32, -45.5, 686, 525, 0.026), (.337, -47, 527, 553, .025), (.365, -47, 527, 644, .027),
             (.392, -41, 527, 534, 0.013), (.5, -47.5, 780, 910, .012), (2.9, -45, 550, 580, 0.015),
             (3.985, -37.5, 844, 843, 0.029), (4.24, -45, 1080, 1090, .025), (4.26, -43, 864, 910, 0.045),
             (7.466, -41, 674, 683, 0.022), (8.455, -47, 1000, 940, .035), (8.572, -38, 766, 1220, 0.0184),
             (8.596, -39, 1240, 1010, 0.023), (8.93, -45, 410, 554, .033), (8.935, -47, 850, 1120, 0.018)]
GULP_PAN_DB = 4.5  # left minus right


def gulps():
    """Larger air pockets change shape while they ring, so their pitch slides."""
    s, db, from_hz, to_hz, slide_s = np.transpose(AIR_GULPS)
    glide = (to_hz / from_hz - 1) / slide_s
    return grains(s, db, from_hz, 3.0 * slide_s, 0.34 * slide_s, glide, np.array(GULP_PAN_DB))


# droplets flicked off by a tail: start_s, level_db, left_minus_right_db
TAIL_FLICKS = [(0.5948, -41, -14), (0.8339, -54, 4), (0.9157, -52, 3), (1.1076, -35, 3),
               (2.5058, -46.5, 22), (3.1742, -56, 2.0), (3.3034, -60, 0.5), (3.721, -46, 14),
               (4.3914, -48, 0), (5.1687, -57, 2.0), (5.3901, -57, 1), (6.5201, -57, -11),
               (6.5405, -52, -14), (6.6009, -57, -1), (6.756, -50, -7), (6.774, -34.5, -15),
               (7.3093, -59.5, 16), (7.501, -44, -11), (7.5303, -58, -1), (7.554, -50, -6),
               (7.6535, -47, 5), (8.2294, -52, -3), (8.6338, -46, -2), (8.7204, -42.5, 8),
               (9.0164, -48, -8), (9.0275, -44, -6), (9.2918, -55, -7), (9.5861, -65, 7)]


def flicks():
    """Thrown droplets tick sharply: 70 very short tones each, from 3.5 to 15.4 kHz."""
    s, db, pan_db = np.array(TAIL_FLICKS).T[:, :, None]
    late, pitch = np.moveaxis(rng.random((len(s), 70, 2)), -1, 0)
    tone_db = db - 9 - 9 * pitch - 6 * late
    return grains(s + .0015 * late, tone_db, 3500 * 4.4 ** pitch, 0.0045, .00003, 0, pan_db)


def scene():
    """Basin, water, insect and air together."""
    trickle_db, gurgle_db, fizz_db, spray_db, pan_db = stirring()
    bubbles = trickle(trickle_db, pan_db) + gurgle(gurgle_db, pan_db) + fizz(fizz_db, pan_db)
    slops = surges(.008, 1.6, 2.2, count=800)
    water = walls(bubbles * slops) + spray(spray_db, pan_db)
    hits = slaps() + drips(trickle_db, count=30) + plops() + gulps() + flicks()
    bodies = rumble() + thuds()
    return water + hits + bodies + insect() + air()


def roll_off(x):
    """The treble ends steeply here."""
    return signal.sosfilt(signal.butter(12, 16510, fs=SR, output="sos"), x)


def record(dry):
    """The microphones lose the deepest bass and the very top."""
    no_bass = signal.sosfilt(signal.butter(3, 55, "high", fs=SR, output="sos"), dry)
    mix = signal.sosfilt(signal.ellip(8, .2, 50, 15400, fs=SR, output="sos"), no_bass)
    return roll_off(mix)


dry = scene()
out = record(dry)
materialize(out)
```